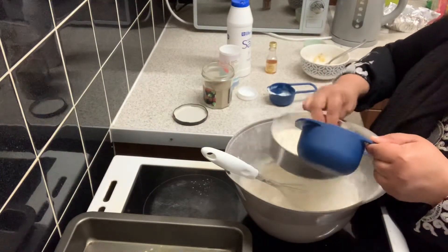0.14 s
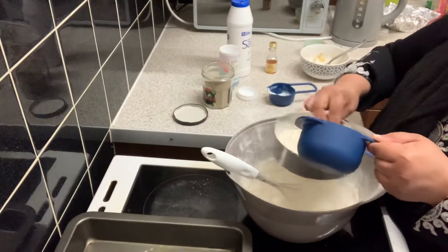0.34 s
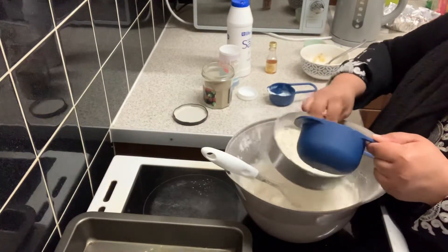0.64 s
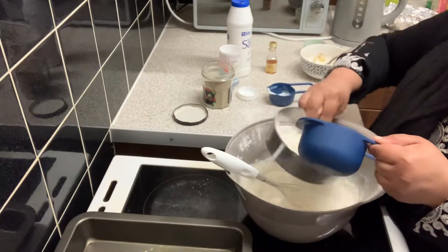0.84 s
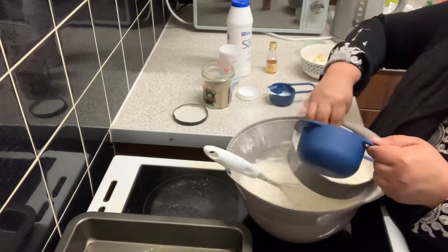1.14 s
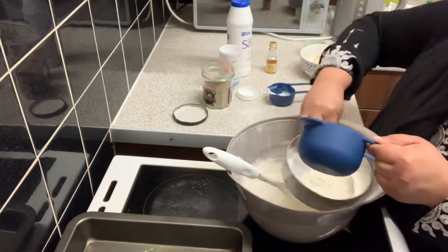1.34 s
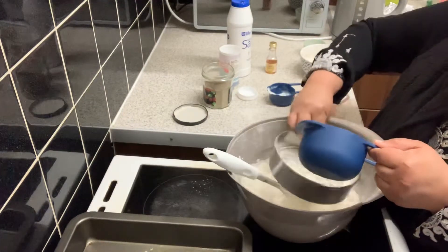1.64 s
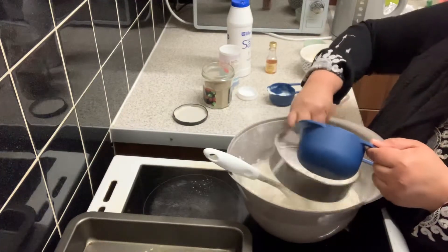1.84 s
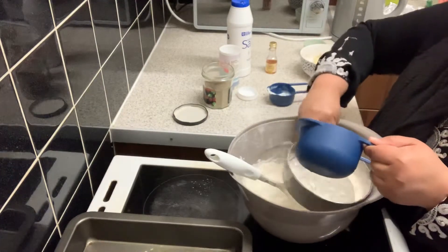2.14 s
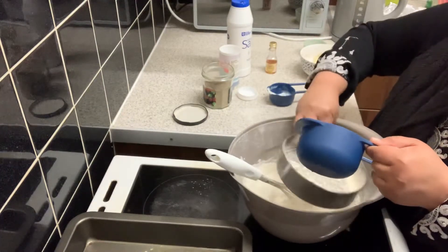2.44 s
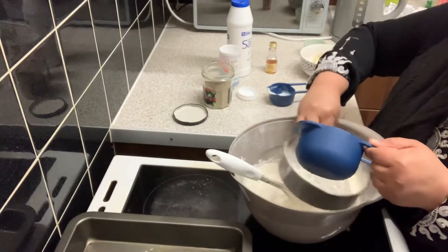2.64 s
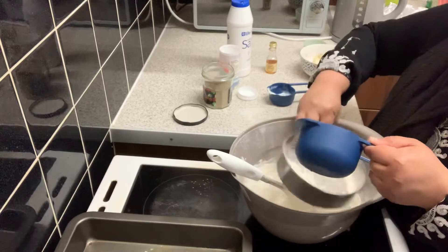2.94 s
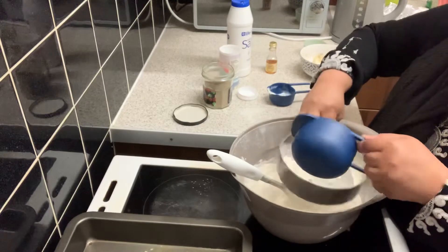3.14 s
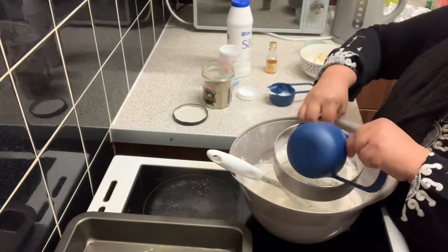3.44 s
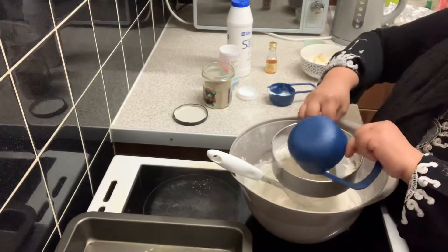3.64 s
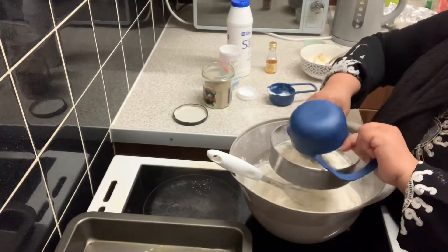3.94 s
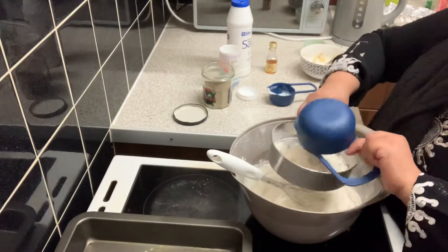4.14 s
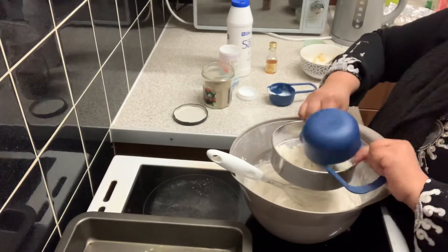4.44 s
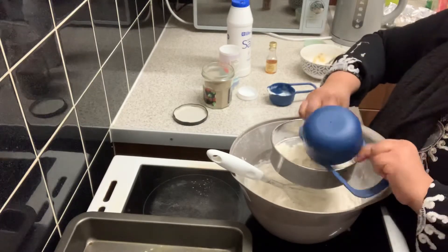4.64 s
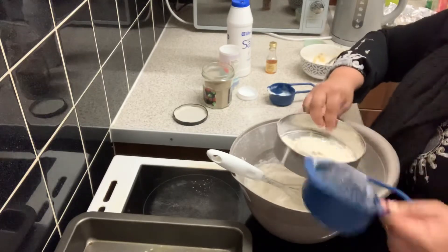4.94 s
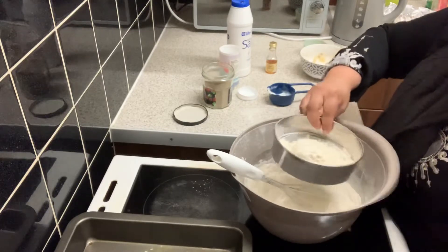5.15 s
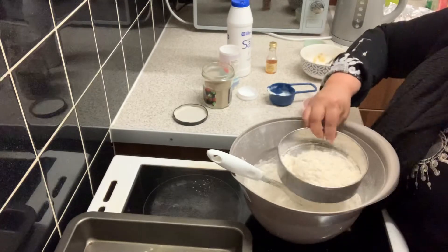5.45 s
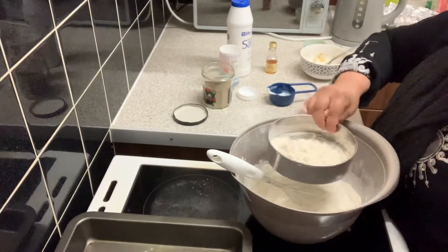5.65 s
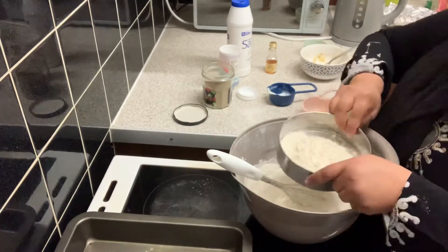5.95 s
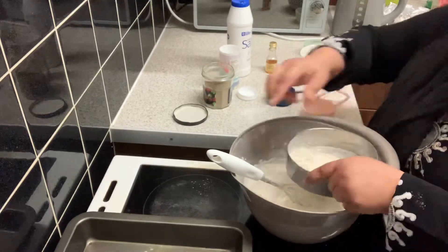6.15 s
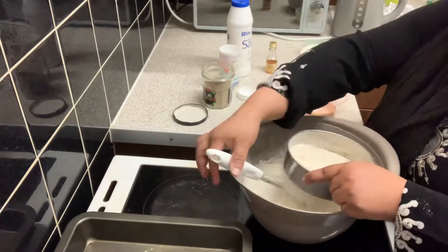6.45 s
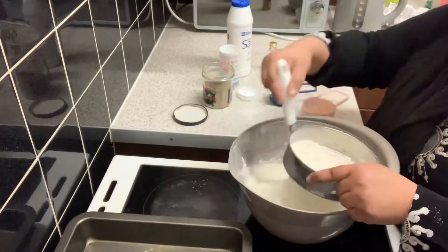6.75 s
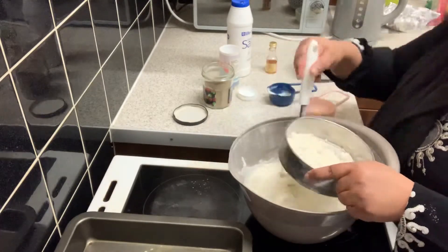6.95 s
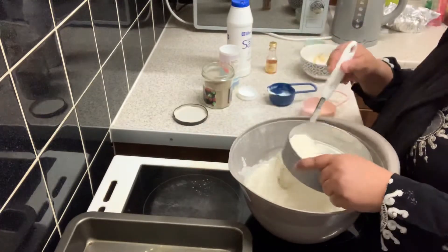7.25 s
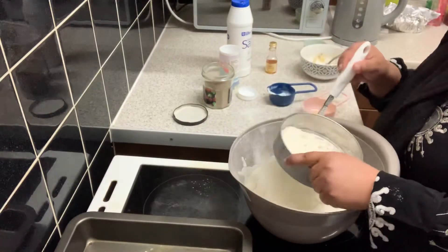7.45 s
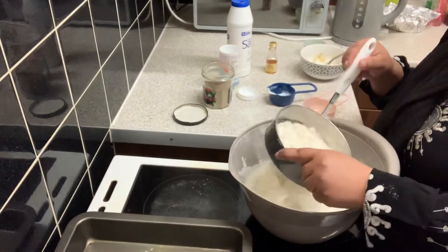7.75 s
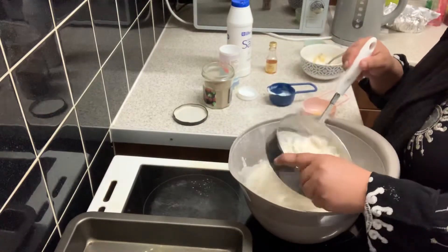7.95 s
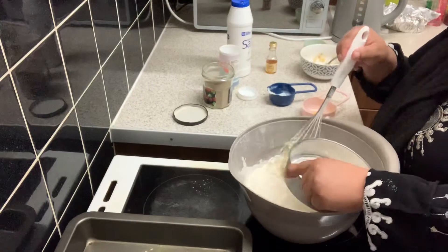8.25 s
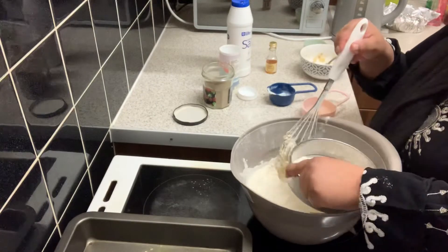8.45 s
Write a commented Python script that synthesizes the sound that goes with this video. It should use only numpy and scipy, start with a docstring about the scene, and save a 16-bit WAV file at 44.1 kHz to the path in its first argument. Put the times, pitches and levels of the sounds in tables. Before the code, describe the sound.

Soft flour swishes over a faint hum, then eleven quick sieve knocks thumping a steel bowl, cup taps, a sieve drop and whisk clinks.

```python
"""Flour swishes on a sieve's mesh over a low hum, close to a pair of microphones in a small tiled kitchen.
Then the sieve is knocked eleven times over a steel bowl, each knock followed by a thump of the bowl on the worktop;
a plastic cup is tapped empty on the rim, the sieve drops into the bowl, a whisk clinks, and flour swishes again.
Blows are a noise crack, decaying modes and a slow boom; flour is grainy noise, the hum is wavering sines over
coloured noise, and the room is a decaying noise echo."""
import sys
import numpy as np
from scipy import signal
from scipy.fft import rfft, irfft, next_fast_len
from scipy.io import wavfile
from scipy.ndimage import uniform_filter1d

SR = 44100
rng = np.random.default_rng(int(sys.argv[2]) if len(sys.argv) > 2 else 0)


def output_pcm(signal):
    """Save a mono or channel-first signal as 16-bit PCM at the path in sys.argv[1].

    Samples are clipped to [-1, 1] before scaling.
    """
    pcm = np.clip(np.atleast_2d(signal).T, -1, 1) * 32767
    wavfile.write(sys.argv[1], SR, np.round(pcm).astype(np.int16))


N = 378819  # length in samples
T = np.arange(int(.8 * SR)) / SR  # time axis of one blow or echo [s]

# Sieve knocked over the bowl, levels before the gains in the call:
# (time [s], level [dB], treble against body [dB], bowl thump [dB], chatter of loose metal [dB])
SIEVE_KNOCKS = [(1.096, -20, -16, -20, 1), (1.31, -18.5, -23, -22.5, -7), (1.512, -19.5, -24, -29.5, -23.5),
                (1.693, -15, -28, -24, -12.5), (1.891, -14.5, -25, -22, -16.5), (2.094, -16, -21, -29, -15),
                (2.283, -15.5, -25, -28.5, -18), (2.467, -18, -16.5, -27.5, -14),
                (2.66, -16.5, -21.5, -26, -13.5), (2.854, -14.5, -17.5, -24, -16),
                (3.055, -24.5, -35, -35, -30)]
# Modes of the knocked sieve: (frequency [Hz], level [dB], t60 [s])
SIEVE_MODES = [(595.23, -18, 0.032), (1088, -8, 0.03), (1316, -6, 0.01), (1566, -1, 0.017),
               (2338, -22.5, 0.033), (3400, -12, 0.0097)]
# Colour of its contact crack: (frequency [Hz], level [dB])
SIEVE_CRACK = [(200, -5.5), (600, 0.5), (2500, 0), (3500, -7), (5000, -13), (10500, -14), (14000, -16),
               (16000, -31.5)]


def sieve_knocks():
    """A knocked sieve rings briefly and drives the bowl into the worktop."""
    return blows(SIEVE_KNOCKS, SIEVE_MODES, SIEVE_CRACK, gain_db=-7, rise_s=0.002, detune=0.022,
                 crack_db=-4.0, crack_t60=0.039, chatter_t60=0.22,
                 treble_hz=4306, treble_db=-0.5, thump_db=-1.0, thump_lag_s=.005)


# Bowl and worktop modes: (frequency [Hz], level [dB], t60 [s])
BOWL_MODES = [(76.2, -14, 0.68), (114.4, -2.5, 0.15), (123.06, -12, .25), (136, -11, 0.43), (146, 0.5, .06),
              (184.1, -1, .17), (240, -4.5, 0.044), (283.7, -4, 0.075), (332.2, -8, .15), (466, -22, 0.25)]


def thump():
    """The bowl and the worktop under it swing up slowly and boom."""
    boom = ring(BOWL_MODES, scatter_db=3.0, detune=.025, rise_s=.008, stagger_s=.0015)
    boom = low_cut(boom, hz=52)
    return boom / loudest(boom, .02)


# The bowl rocks back and settles on the worktop: (time [s], level [dB])
BOWL_ROCKS = [(1.16, -29.5), (4.278, -28.5), (6.36, -49), (8.015, -40.5), (8.06, -46), (8.45, -49)]


def rocking():
    """The settling bowl thumps softly, without a metal contact."""
    out = np.zeros(N)
    for s, db in BOWL_ROCKS:
        add(out, undb(db) * thump(), s)
    return out


# The sieve's steel wall clanks on the rim, levels before the gains in the call:
# (time [s], level [dB], treble against body [dB], bowl thump [dB], chatter of loose metal [dB])
WALL_CLANKS = [(1.089, -19.5, 2, -37, -3), (1.098, -24.5, 1, -37, -3), (1.119, -30.5, 0, -44.5, -5),
               (3.311, -28, -1, -50, -20), (6.317, -46, -3, -46, 2.5), (8.225, -34, -10, -46, -4),
               (8.375, -19, -7.5, -32.5, -9), (8.584, -42, -9, -52, -11)]
# Modes of the sieve wall: (frequency [Hz], level [dB], t60 [s])
WALL_MODES = [(1286, 0, .017), (1838, -10.5, .018), (2610, -6.5, .018), (2937, -10, .035),
              (3240, -5.5, .013)]
# Crack of steel on steel, also for the dropped sieve: (frequency [Hz], level [dB])
METAL_CRACK = [(200, 1.5), (900, 3.5), (1600, -0.5), (3300, -1.5), (4300, -7), (7200, -9), (10500, -9.5),
               (14000, -14.5), (16000, -24.5)]


def wall_clanks():
    """The struck steel wall of the sieve rings in short, high modes."""
    return blows(WALL_CLANKS, WALL_MODES, METAL_CRACK, gain_db=-8.0, rise_s=0.001983, detune=0.016,
                 crack_db=-2.5, crack_t60=0.032, chatter_t60=0.12,
                 treble_hz=2300, treble_db=-1.0, thump_db=1, thump_lag_s=.009)


# Plastic cup tapped on the rim, levels before the gains in the call:
# (time [s], level [dB], treble against body [dB], bowl thump [dB], chatter [dB])
CUP_TAPS = [(4.244, -32, 1.5, -30, -8.5), (4.428, -18, 0, -40.5, -15.5), (4.609, -11, -12, -50, -18.5)]
# Modes of the cup: (frequency [Hz], level [dB], t60 [s])
CUP_MODES = [(400, -18, .03), (580, -14.5, 0.045), (900, -4, .02), (1004, -8, 0.052), (1191, -1, 0.035),
             (2780, -15, 0.017), (4330, -18.5, 0.016), (5714, -21.5, .012)]
# Colour of its contact crack: (frequency [Hz], level [dB])
CUP_CRACK = [(200, -8), (600, 0), (1300, 2), (2200, -4.5), (3400, -7.5), (4600, -5), (10500, -2),
             (14000, -12), (16000, -26)]


def cup_taps():
    """The plastic cup answers each tap with a very short crack and quickly damped modes."""
    return blows(CUP_TAPS, CUP_MODES, CUP_CRACK, gain_db=-3.5, rise_s=.001, detune=0.011,
                 crack_db=-2.0, crack_t60=0.011, chatter_t60=0.075,
                 treble_hz=2000, treble_db=1, thump_db=-3.5, thump_lag_s=.01)


# Sieve dropped into the bowl, levels before the gains in the call:
# (time [s], level [dB], treble against body [dB], bowl thump [dB], chatter of loose metal [dB])
SIEVE_DROP = [(5.213, -12, -13.5, -35, -15), (5.268, -22.5, -11, -32.5, -6), (5.304, -29.5, -28, -39, 2),
              (5.34, -27, -19.5, -42.5, 4), (5.507, -45, -13, -56.5, -3)]
# Modes of the rim: (frequency [Hz], level [dB], t60 [s])
RIM_MODES = [(235, -13, .15), (447.4, -15.5, 0.06), (720, -12.5, 0.041), (929, -8.5, 0.058),
             (1170, -8.5, 0.097), (1260, -0.5, 0.029), (1850, -19, 0.15), (3350, -14, 0.037),
             (3570, -22, .12), (5640, -24.5, .08)]


def sieve_drop():
    """The falling sieve makes the rim ring and bounces in ever weaker contacts."""
    return blows(SIEVE_DROP, RIM_MODES, METAL_CRACK, gain_db=-4, rise_s=.003, detune=.006,
                 crack_db=-1, crack_t60=0.018, chatter_t60=.18,
                 treble_hz=4000, treble_db=3.5, bounce_db=-16, thump_db=-7, thump_lag_s=.01)


# Whisk wires against the bowl, levels before the gains in the call:
# (time [s], level [dB], treble against body [dB], bowl thump [dB], chatter of loose metal [dB])
WHISK_CLINKS = [(7.408, -47, -14.5, -55.5, -17.5), (7.573, -26.5, -16, -53, -16.5),
                (7.581, -30.5, -8, -53, 5), (7.777, -37.5, -10, -58, -17), (7.784, -29.5, -7.5, -58, -8.5),
                (7.797, -34.5, -7.5, -60, -11), (7.972, -35.5, -3.5, -46, 9), (7.991, -35.5, -5.5, -43, -4)]
# Modes of the wires: (frequency [Hz], level [dB], t60 [s])
WHISK_MODES = [(1115, -11, .025), (1324, -9, .035), (1782, -9, .022), (3020, 0, .022), (4670, -11.5, 0.027),
               (5730, -12, .025), (6420, -10.5, 0.019), (9300, -6, 0.023)]
# Colour of their contact crack: (frequency [Hz], level [dB])
WIRE_CRACK = [(200, -5), (900, -7), (1600, 3), (3300, -5), (4300, -5.5), (6000, -5), (10200, -3.5),
              (13500, -7), (16000, -19)]


def whisk_clinks():
    """Thin wires ring high and bounce on the bowl."""
    return blows(WHISK_CLINKS, WHISK_MODES, WIRE_CRACK, gain_db=-7.5, rise_s=.003, detune=.016,
                 crack_db=1, crack_t60=0.022, chatter_t60=0.11,
                 treble_hz=4350, treble_db=3, bounce_db=-12, thump_db=-2.5, thump_lag_s=0.00804)


def blows(table, modes, crack, gain_db, rise_s, detune, crack_db, crack_t60, chatter_t60,
          treble_hz, treble_db, thump_db, thump_lag_s, bounce_db=None):
    """Each blow cracks, rings its object, chatters on in tiny contacts and then shoves the bowl."""
    out = np.zeros(N)
    for s, db, bright_db, boom_db, chatter_db in table:
        tone = ring(modes, scatter_db=2.0, detune=detune, rise_s=rise_s, stagger_s=.00005)
        spikes = undb(2.9 * rng.exponential(size=len(T)))
        contacts = unit(rng.standard_normal(len(T)) * spikes)
        pressure = fade(crack_t60) + undb(chatter_db) * fade(chatter_t60)
        grit = coloured(contacts * pressure, crack)
        tone = tone / loudest(tone, 0.0037)
        grit = undb(crack_db) * grit / loudest(grit, .004)
        blow = low_cut(tone + grit, hz=200)
        # a harder contact puts more of the blow into the treble
        treble = shape(blow, lambda f: 1 - 1 / (1 + (f / treble_hz) ** 8))
        body = blow - treble
        treble = undb(bright_db + treble_db) * treble / loudest(treble, 0.0027)
        blow = body / loudest(body, .004) + treble
        if bounce_db is not None:
            blow = rebounds(blow, bounce_db, gap_s=.005, t60=.13)
        add(out, undb(db + gain_db) * blow, s)
        add(out, undb(boom_db + thump_db) * thump(), s + thump_lag_s)
    return out


def ring(modes, scatter_db, detune, rise_s, stagger_s):
    """Modes swell during contact, then decay; each blow's spot weights, detunes and staggers them anew."""
    since = T - rise_s
    free = np.zeros(len(T))
    for hz, db, t60 in modes:
        weight, shift, delay = rng.standard_normal(3)
        level = undb(db + scatter_db * weight - 60 * np.maximum(since, 0) / t60)
        phase = 2 * np.pi * hz * (1 + detune * shift) * (since + stagger_s * delay)
        free += level * np.cos(phase)
    return free * np.sin(np.pi / 2 * np.minimum(T / rise_s, 1)) ** 2


def rebounds(x, db, gap_s, t60, count=10):
    """Loose metal bounces: the blow comes again at uneven gaps, ever weaker."""
    out = x.copy()
    for s in np.cumsum(gap_s * (.5 + rng.random(count))):
        out += undb(db) * undb(-60 * s / t60) * np.pad(x, int(s * SR))[:len(x)]
    return out


# Flour slides as the sieve is shaken or tilted, levels before the gain in the call:
# (middle [s], length [s], level [dB], strongest band [Hz])
FLOUR_SLIDES = [(.01, .1, -66, 3180), (.13, .11, -68, 4500), (0.212, .12, -67.5, 3700),
                (0.331, .11, -70, 3500), (0.406, .1, -71, 2780), (0.544, .14, -71, 3000),
                (.745, 0.14, -65, 2200), (0.956, 0.087, -67.5, 3000), (4.044, .065, -70, 1970),
                (5.845, .04, -73, 5500), (6.11, 0.095, -71, 2100), (6.19, 0.1, -73, 4500),
                (6.365, .07, -63, 2200), (6.44, .055, -69, 2000), (6.598, 0.19, -68.5, 2740),
                (6.716, .08, -72.5, 3400), (6.89, 0.073, -69, 4200), (7.07, 0.085, -74, 4500),
                (7.272, 0.11, -63, 2960), (8.414, 0.13, -56, 1900), (8.559, .078, -56, 2980)]
# Colour of flour on the mesh: (frequency [Hz], level [dB])
SWISH_COLOUR = [(300, -4), (800, -2.5), (1600, -7), (2900, 0), (5000, -4.5), (12000, -14), (16000, -22)]


def swishes(gain_db, flicker_db, grain_db, band_db, mesh_hiss_db, width_octaves):
    """Flour on the mesh is a faint grainy hiss; every stroke swells and fades with a colour of its own."""
    grains = wide_noise(N) * undb(grain_db * rng.exponential(size=N))
    flicker = unit(shape(rng.standard_normal(N), lambda f: np.exp(-f / 60)))
    hiss = unit(coloured(grains, SWISH_COLOUR)) * undb(flicker_db * flicker)
    out = undb(mesh_hiss_db) * hiss
    time = np.arange(N) / SR
    for middle, length, db, peak_hz in FLOUR_SLIDES:
        swell = np.maximum(1 - (2 * (time - middle) / length) ** 2, 0) ** 2
        on = swell > 0

        def stroke_colour(f):
            octaves_away = np.log2((f + 1) / peak_hz)
            return undb(band_db * np.exp(-(octaves_away / width_octaves) ** 2))

        if on.any():
            rustle = shape(hiss[:, on], stroke_colour)
            out[:, on] += undb(db) * swell[on] * unit(rustle)
    return undb(gain_db) * out


# Colour of the low room noise: (frequency [Hz], level per Hz [dB])
ROOM_NOISE = [(15, -37.5), (25, -16.5), (50, -5.5), (97, 0), (149, -9.5), (200, -3.5), (249, -14),
              (309, -2.5), (363, -9), (695, -28), (5880, -40.5), (11900, -39.5), (16000, -58.5)]
# Hum lines of an appliance: (frequency [Hz], level [dB])
HUM_LINES = [(199, -74), (299, -70.5)]


def background(noise_db, waver):
    """Low coloured room noise, and an appliance's hum as sines of slightly drifting frequency."""
    out = undb(noise_db) * unit(coloured(wide_noise(N), ROOM_NOISE))
    for hz, db in HUM_LINES:
        drift = unit(shape(rng.standard_normal(N), lambda f: np.exp(-f / 12)))
        phase = 2 * np.pi * np.cumsum(hz * (1 + waver * drift)) / SR
        out = out + undb(db) * unit(np.sin(phase))
    return out


# Decay of the kitchen's tail: (frequency [Hz], t60 [s])
ROOM_T60 = [(100, 0.77), (400, 0.4859), (1200, 0.47), (2800, 0.5834), (5500, 0.3261), (11000, 0.5),
            (16000, 0.01)]
# Colour of its echo, before the wet level of each source: (frequency [Hz], level [dB])
ROOM_COLOUR = [(60, -8), (200, -5), (500, 4.5), (1200, -2.5), (3000, -2), (6000, 1), (13500, -6),
               (16000, -14.5)]


def kitchen(early_db, early_t60, build_s):
    """Noise echo: dense early returns from tiles and worktop, then a tail fading band by band."""
    noise = wide_noise(len(T))
    octaves = np.arange(6, 15)  # band centres, powers of two in Hz
    tail = 0
    for octave, pick in zip(octaves, np.eye(len(octaves))):
        band = shape(noise, lambda f: np.interp(np.log2(f + 1), octaves, pick))
        decay = fade(at(ROOM_T60, 2. ** octave)) + undb(early_db) * fade(early_t60)
        tail = tail + band * decay
    tail = tail * (1 - np.exp(-(T / build_s) ** 2))
    return coloured(unit(tail) / np.sqrt(len(T)), ROOM_COLOUR)


def placed(x, room, wet_db, left_db, left_lag):
    """Direct sound, left_db louder and left_lag samples later at the left microphone, plus the room."""
    left = undb(left_db / 2) * np.pad(x, (max(left_lag, 0), 0))[:N]
    right = undb(-left_db / 2) * np.pad(x, (max(-left_lag, 0), 0))[:N]
    echo = signal.fftconvolve(x[None], room, axes=1)[:, :N]
    return np.array([left, right]) + undb(wet_db) * echo


# Width of diffuse sound at the microphone pair: (frequency [Hz], side minus mid [dB])
ROOM_SIDE = [(60, -12), (150, -8.5), (300, -1), (500, 1), (1200, 2), (4000, -1), (8000, 3.5), (12000, -4)]


def wide_noise(count):
    """Diffuse noise at two microphones: alike in the bass, mostly unrelated above."""
    mid, side = rng.standard_normal((2, count))
    mid = shape(mid, lambda f: (1 + undb(at(ROOM_SIDE, f)) ** 2) ** -.5)
    side = shape(side, lambda f: (1 + undb(-at(ROOM_SIDE, f)) ** 2) ** -.5)
    return np.array([mid + side, mid - side])


def undb(db):
    """Decibels to gain."""
    return 10 ** (np.asarray(db) / 20)


def fade(t60):
    """Exponential decay that falls 60 dB in t60 seconds."""
    return np.exp(-np.log(1000) * T / t60)


def at(points, hz):
    """Read a table on a log-frequency axis."""
    f, value = np.transpose(points)
    return np.interp(np.log(np.maximum(hz, 1)), np.log(f), value)


def shape(x, gain):
    """Filter x with a gain given as a function of frequency."""
    size = next_fast_len(x.shape[-1] + len(T))
    hz = np.arange(size // 2 + 1) * SR / size
    return irfft(rfft(x, size) * gain(hz), size)[..., :x.shape[-1]]


def coloured(x, points):
    """Filter x by a table of (frequency [Hz], level [dB])."""
    return shape(x, lambda f: undb(at(points, f)))


def low_cut(x, hz):
    """An object radiates little below a frequency set by its size."""
    return signal.sosfilt(signal.butter(3, hz, "high", fs=SR, output="sos"), x)


def unit(x):
    """Scale to rms 1."""
    return x / np.sqrt(np.mean(x ** 2))


def loudest(x, span_s):
    """Rms of the loudest short stretch."""
    return np.sqrt(uniform_filter1d(x ** 2, max(int(span_s * SR), 1)).max())


def add(out, x, s):
    """Mix x into out at time s."""
    i = min(max(int(s * SR), 0), N)
    out[..., i:i + len(x)] += x[:N - i]


def scene():
    """All the utensils in one kitchen, each with its own place before the microphone pair."""
    room = kitchen(early_db=3.5, early_t60=0.11, build_s=0.002)
    out = placed(sieve_knocks() + rocking(), room, wet_db=-1, left_db=-0.5, left_lag=1)
    out += placed(wall_clanks(), room, wet_db=0.5, left_db=0.2053, left_lag=2)
    out += placed(cup_taps(), room, wet_db=-0.5, left_db=0.2, left_lag=3)
    out += placed(sieve_drop(), room, wet_db=-2.0, left_db=0.7, left_lag=-10)
    out += placed(whisk_clinks(), room, wet_db=2.5, left_db=0.5, left_lag=1)
    out += swishes(gain_db=-0.5, flicker_db=3.0, grain_db=2.5, band_db=6,
                   mesh_hiss_db=-89.5, width_octaves=0.34)
    return out + background(noise_db=-62.5, waver=.015)


def record(dry):
    """The right microphone takes more bass; one treble band is mostly in opposite phase; the top is cut."""
    lean = [(100, 2.0), (250, 1.1), (500, 0.026)]  # (frequency [Hz], right up and left down [dB])
    # what both microphones share: (frequency [Hz], level [dB])
    shared = [(7000, 0), (8000, -13.5), (9200, -14.5), (10000, 0)]
    mid = dry.mean(axis=0)
    side = dry - mid
    left_right = np.array([[-1], [1]])
    heard = shape(side + coloured(mid, shared), lambda f: undb(left_right * at(lean, f)))
    top_cut = signal.ellip(8, .2, 70, 15600, fs=SR, output="sos")  # 15600 Hz
    return signal.sosfilt(top_cut, heard)


dry = scene()
out = record(dry)
output_pcm(out)
```